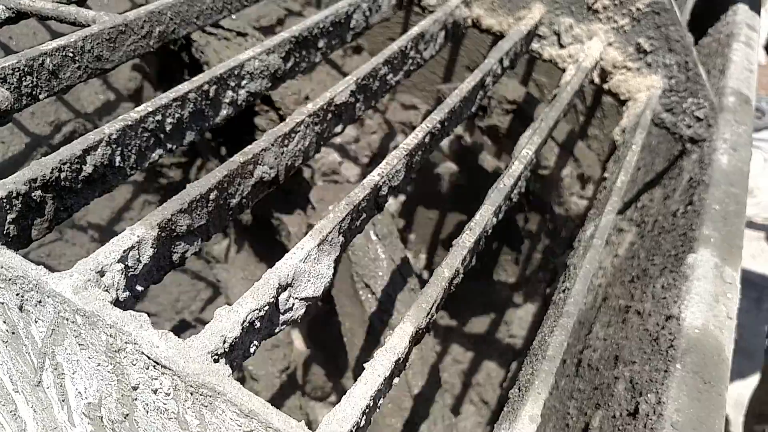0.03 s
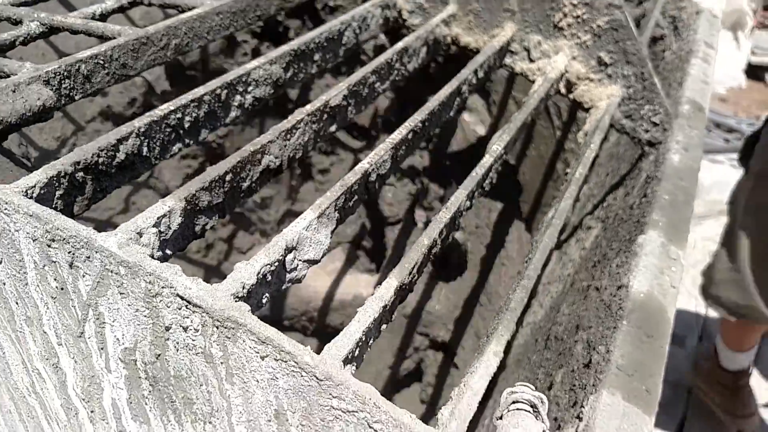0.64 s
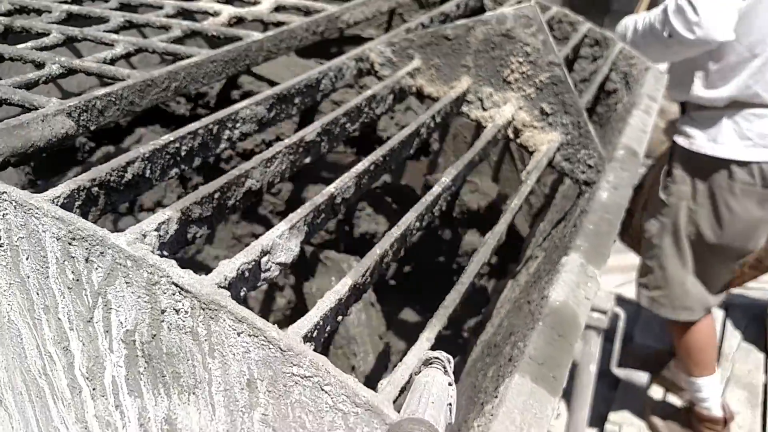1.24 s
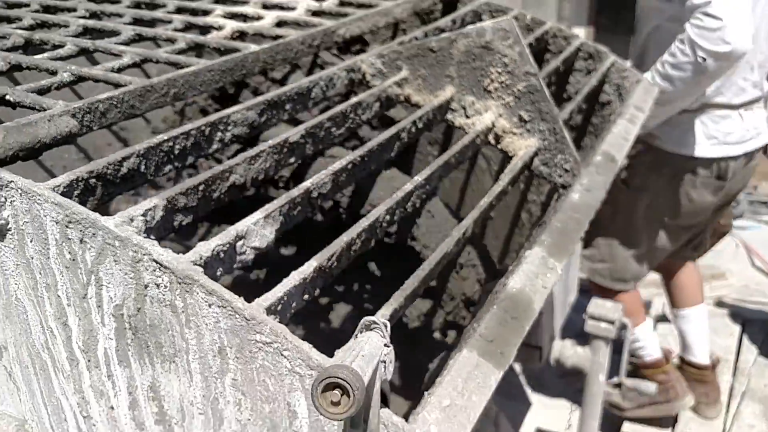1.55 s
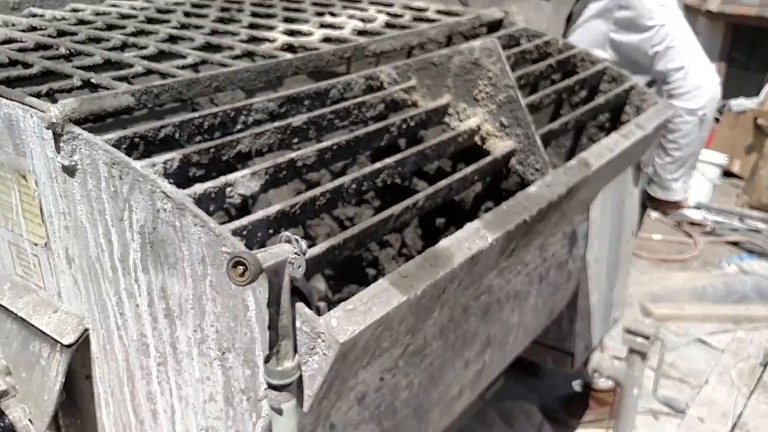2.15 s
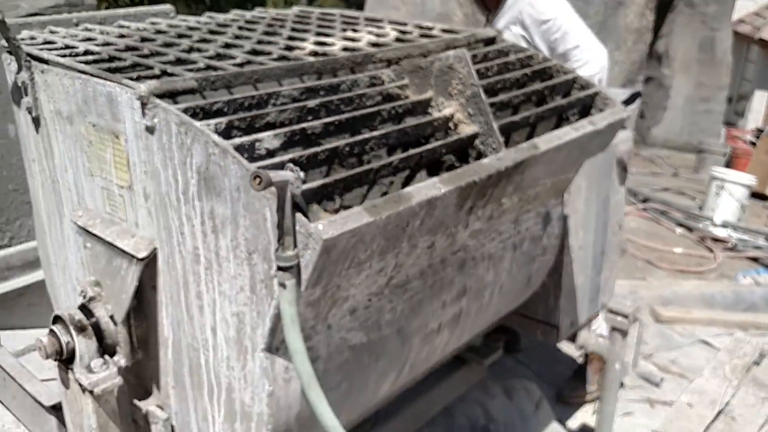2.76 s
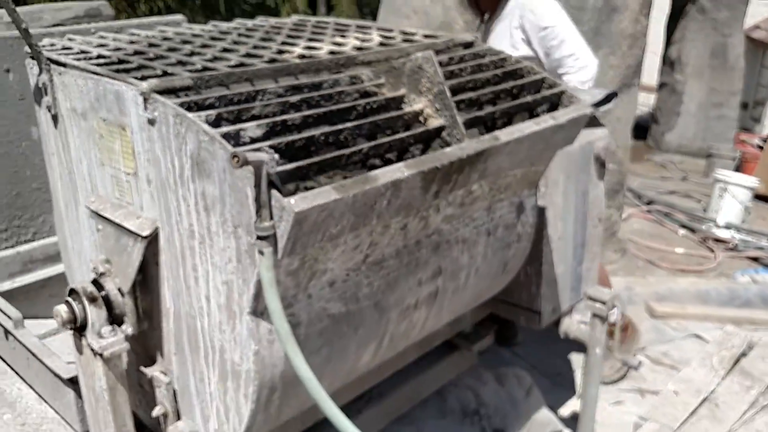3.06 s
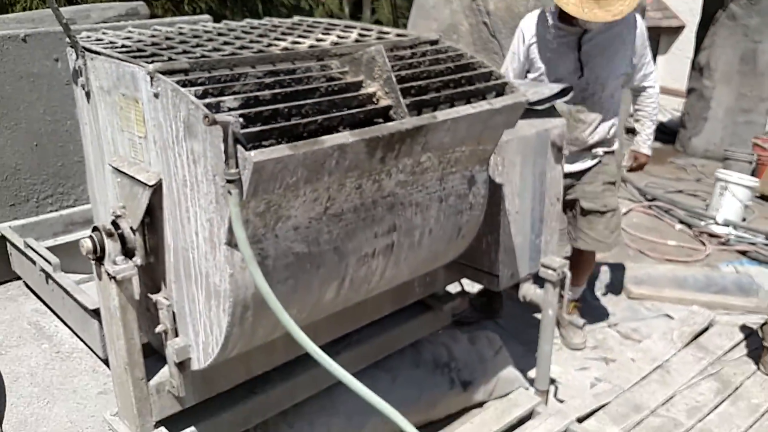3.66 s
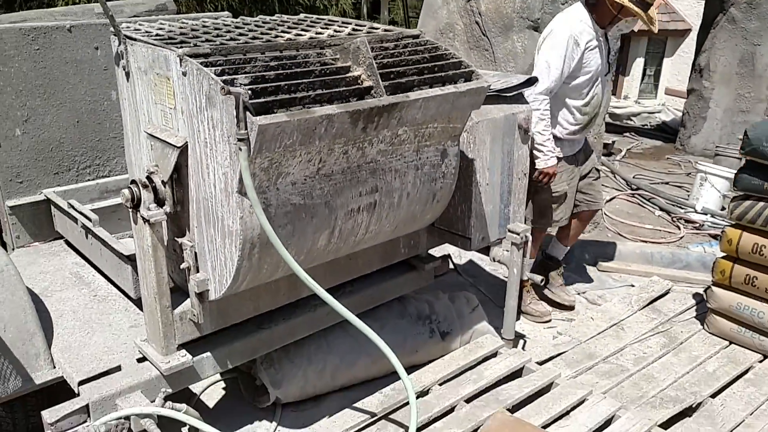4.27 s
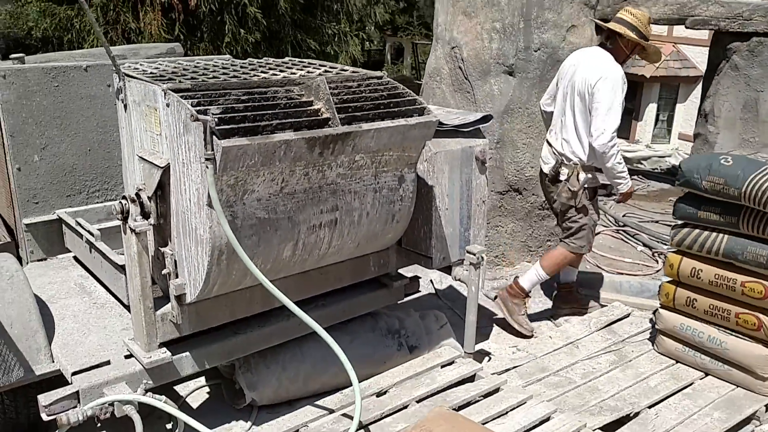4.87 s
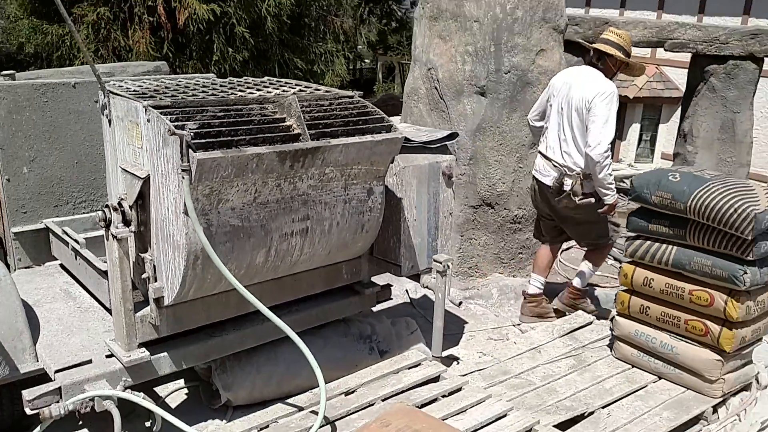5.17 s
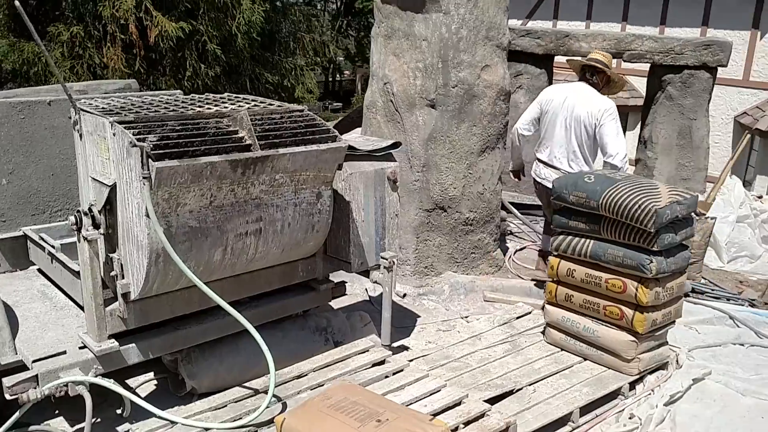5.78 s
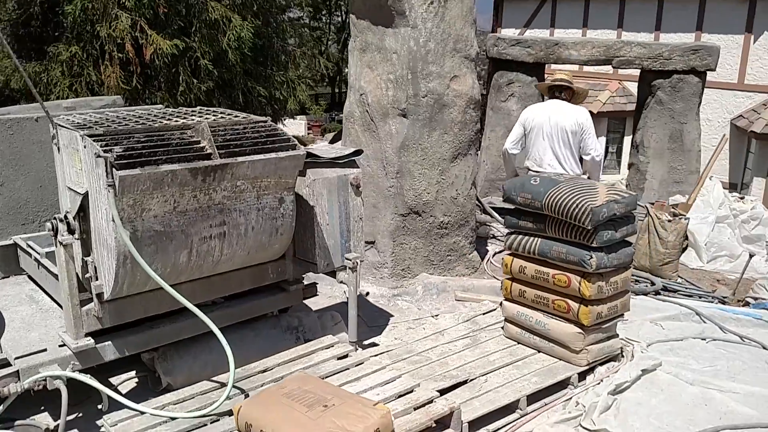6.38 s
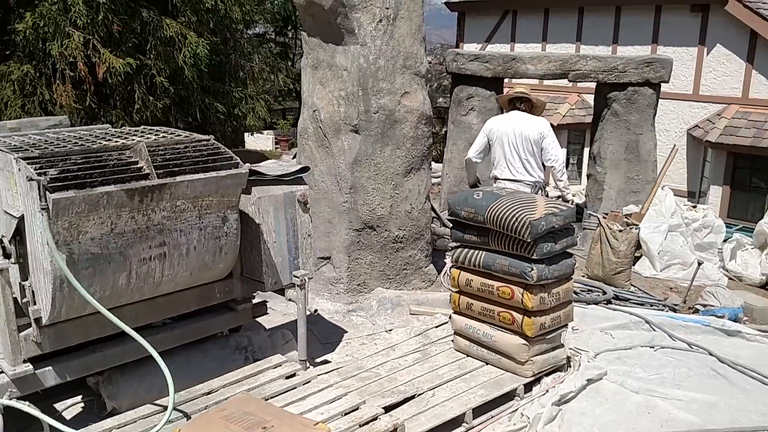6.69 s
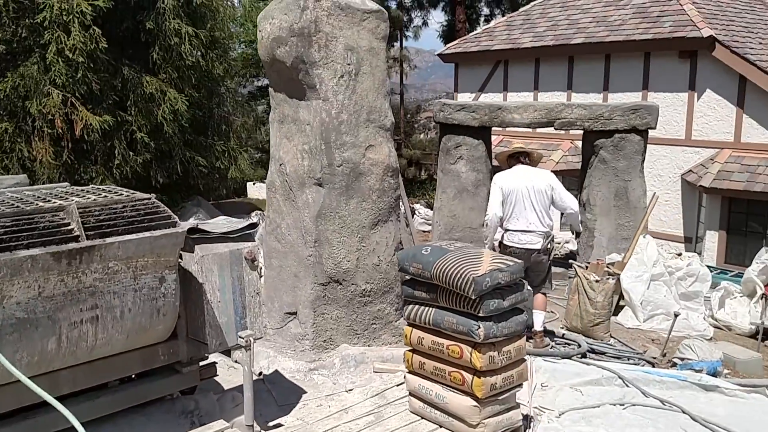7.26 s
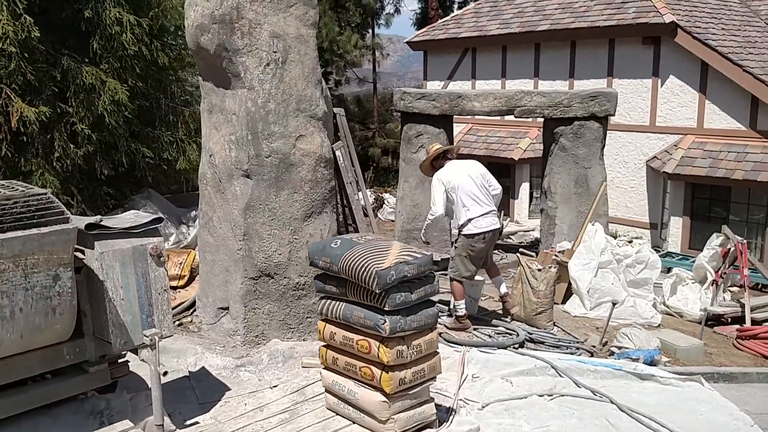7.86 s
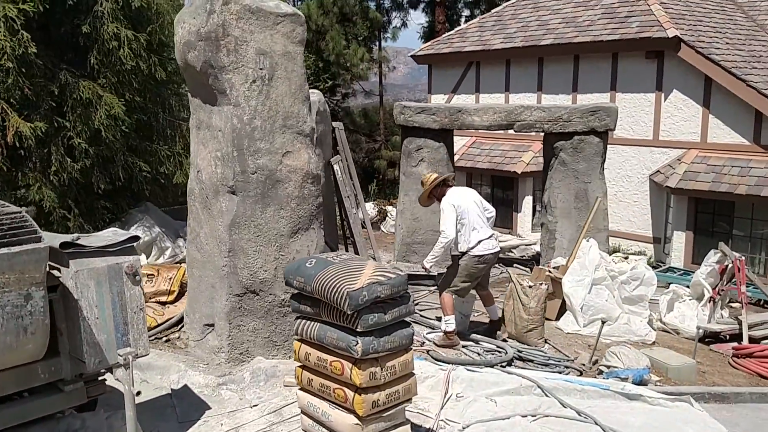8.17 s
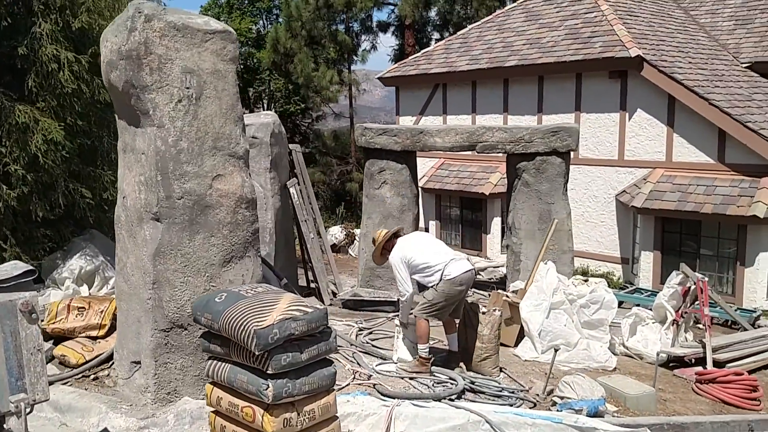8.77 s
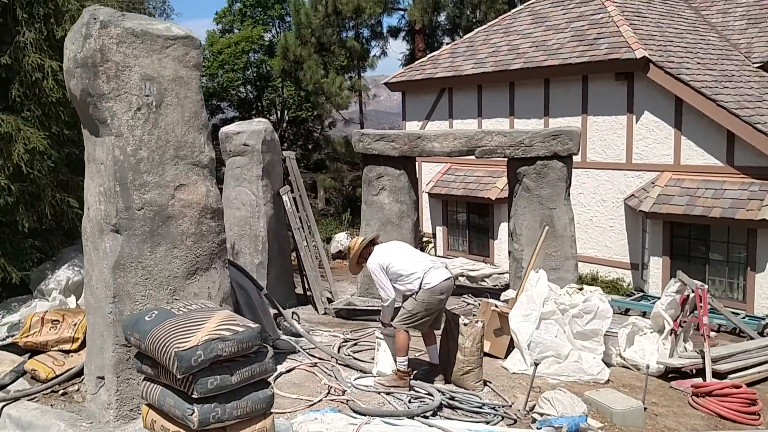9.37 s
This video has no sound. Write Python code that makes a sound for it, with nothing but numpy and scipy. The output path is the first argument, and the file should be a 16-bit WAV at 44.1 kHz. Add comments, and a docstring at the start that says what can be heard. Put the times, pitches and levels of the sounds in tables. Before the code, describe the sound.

A mortar mixer's engine chugs steadily outdoors with a metallic clatter, its speed sagging and recovering under load.

```python
"""A four-stroke V-twin drives a mortar mixer on a building site, its speed sagging as the paddles dig in.
Two unevenly spaced exhaust pulses excite the resonances of the pipes and the intake thumps in its air box.
Each firing forces the block, hood and loose steel into vibration; a gear whine and a hiss come and go.
The listener starts over the churning drum, where a paddle knocks once, then steps back and turns away."""
import sys
import numpy as np
from scipy import signal
from scipy.fft import rfft, irfft, next_fast_len
from scipy.io import wavfile
from scipy.ndimage import uniform_filter1d

SR = 44100
rng = np.random.default_rng(int(sys.argv[2]) if len(sys.argv) > 2 else 0)


def to_wav(s):
    """Save 16-bit WAV."""
    ch = np.atleast_2d(s).T  # columns
    pcm = np.round(np.clip(ch, -1, 1) * 32767)  # PCM
    wavfile.write(sys.argv[1], SR, pcm.astype(np.int16))


N = 424683
TIME = np.arange(N) / SR
FFT_SIZE = next_fast_len(N + SR // 2, True)
FREQS = np.fft.rfftfreq(FFT_SIZE, 1 / SR)


def undb(db):
    """Amplitude ratio of a level in decibels."""
    return 10 ** (np.asarray(db) / 20)

def unit(x):
    """Normalisation to rms 1."""
    return x / np.sqrt(np.mean(x ** 2))

def steady(x):
    """Running normalisation to rms 1 over about half a second."""
    power = uniform_filter1d(x * x, size=SR // 2)
    return x / np.sqrt(uniform_filter1d(power, size=SR // 8) + 1e-18)

def curve(table, column=1):
    """Linear interpolation of a table column over time."""
    rows = np.array(table)
    return np.interp(TIME, rows[:, 0], rows[:, column])

def swells(table):
    """Gaussian envelopes, one around each row's moment."""
    return sum(undb(db) * np.exp(-((TIME - s) / half_s) ** 2) for s, db, half_s in table)

def walk(rate):
    """Slow random modulation of rms 1."""
    hold = int(SR / rate)
    steps = np.repeat(rng.standard_normal(N // hold + 1), hold)
    return unit(uniform_filter1d(steps, hold)[:N])

def through(x, response):
    """Linear filtering: the spectrum is multiplied by a frequency response."""
    return irfft(rfft(x, FFT_SIZE) * response, FFT_SIZE)[:N]

def colour(points):
    """Spectral envelope through (Hz, dB) points on a logarithmic frequency axis."""
    hz, db = np.transpose(points)
    return undb(np.interp(np.log(FREQS + 1), np.log(hz), db))

def ring(modes):
    """Modal superposition: the summed response of damped resonances."""
    s = 1j * FREQS
    return sum(undb(db) * s * width / (s * s + s * width + hz * hz) for hz, width, db in modes)

def dense_ring(decay_s):
    """High modal overlap: the impulse response is decaying noise of unit energy."""
    tail = rng.standard_normal(N) * np.exp(-TIME / decay_s)
    return rfft(tail / np.linalg.norm(tail), FFT_SIZE)

def low_pass(hz):
    """Two-pole low-pass response."""
    s = 1j * FREQS / hz
    return 1 / (1 + np.sqrt(2) * s + s * s)

def high_pass(hz):
    """Two-pole high-pass response."""
    return -(FREQS / hz) ** 2 * low_pass(hz)

def below(hz, order):
    """Zero-phase low-pass response, steeper with higher order."""
    return 1 / (1 + (FREQS / hz) ** order)

def impulses(times, sizes):
    """Impulsive excitation at the given moments."""
    return np.bincount(np.clip(times * SR, 0, N).astype(int), sizes, N + 1)[:N]

def strokes(cycles, phase, scatter_db, jitter_s):
    """Quasi-periodic excitation: one push per cycle, varying in strength and timing."""
    due = np.arange(int(cycles[-1]) + 1) + phase
    times = np.interp(due, cycles, TIME, right=2 * TIME[-1])
    chance = rng.standard_normal((len(times), 2))
    return impulses(times + jitter_s * chance[:, 0], undb(scatter_db * chance[:, 1]))

def bursts(pushes, rise_s, decay_s):
    """Envelope with exponential rise and decay after every push; rms 1."""
    s = 2j * np.pi * FREQS
    return unit(through(pushes, 1 / ((1 + s * rise_s) * (1 + s * decay_s))))

def grains(rate, spread_db):
    """Shot noise: dense tiny impacts of unequal size; rms 1."""
    hits = (rng.random(N) < rate / SR) * rng.standard_normal(N)
    return unit(hits * undb(spread_db * np.minimum(rng.exponential(size=N), 4)))

def detour(x, metres):
    """Propagation delay over an extra path at the speed of sound."""
    return np.interp(TIME - metres / 343, TIME, x)

def bounced(x, path, top_hz):
    """Reflection of the low frequencies over a path that changes as the listener moves."""
    return curve(path, column=2) * detour(through(x, below(top_hz, order=8)), curve(path))

def scatter(x, strength, drift_m, count=3):
    """Comb filtering: reflections off drum, sacks and stones shift as the listener walks."""
    paths_m = rng.uniform(.15, 1.6, count)
    strength = min(strength, .8 / count)  # together weaker than the direct sound
    return x + strength * sum(detour(x, metres + drift_m * walk(1)) for metres in paths_m)


# Paddles dragging in mortar. Each row: time of deepest sag in seconds, cycles per second lost.
PADDLE_LOADS = [(.074, 1.824), (.692, .869), (1.187, 1.058), (1.762, .63), (2.296, .803), (2.969, .469),
                (3.436, .728), (4.15, .596), (4.63, .855), (5.291, .338), (5.685, .571), (6.387, .483),
                (6.892, .694), (7.522, .339), (7.985, .606), (8.821, .543), (9.302, .766)]

def engine_rate():
    """Load and regulation: each paddle lowers the cycle rate, then the governor restores it."""
    unloaded_hz, dig_s, recover_s = 19.348, .508, .487
    sag_hz = sum(lost * np.interp(TIME - s, [-dig_s, 0, recover_s], [0, 1, 0]) for s, lost in PADDLE_LOADS)
    return unloaded_hz - sag_hz


# The chug rises as the listener rounds the drum and falls on walking away.
# Each row: time in seconds, relative level in dB.
CHUG_LEVEL = [(0.4, -16), (0.98, -18), (1.12, -15), (3.05, -11), (4.78, -12.5), (6.38, -13.5), (7.7, -14.5),
              (8.19, -16.5), (9.5, -15.5)]

def with_chug(top_db, share):
    """Common modulation: a level in dB that peaks at top_db and follows a share of the chug's swing."""
    chug_db = curve(CHUG_LEVEL)
    return top_db + share * (chug_db - chug_db.max())


# Modes of the two pipes and the air box. Each row: frequency in Hz, bandwidth in Hz, gain in dB.
PIPE_A_MODES = [(72.8, 20.5, -17.5), (144.9, 8.5, -11.5), (231.5, 37, -19.5), (302.2, 9.1, -18),
                (349, 30.7, -17.5), (551.3, 17.2, -18), (780, 9.3, -35.5)]
PIPE_B_MODES = [(113, 11, -39.5), (239.4, 30, -25.5), (307.6, 41.7, -20), (344.5, 20.3, -19),
                (427.6, 27.3, -15.5), (495, 12, -29.5), (620, 6.5, -39)]
AIR_BOX_MODES = [(97.4, 15.9, -9.5), (170.7, 5.5, -21.5), (348, 160, -28)]

def exhaust_and_intake(cycles):
    """Air-column resonance: gas pulses ring the pipes and, with opposite sign, the air box."""
    pipe_a = through(strokes(cycles, phase=.426, scatter_db=.85, jitter_s=.00005), ring(PIPE_A_MODES))
    pipe_b = through(strokes(cycles, phase=.803, scatter_db=.78, jitter_s=.00005), ring(PIPE_B_MODES))
    intake = through(strokes(cycles, phase=.735, scatter_db=.84, jitter_s=.00005), ring(AIR_BOX_MODES))
    # the muffler absorbs the treble, and small openings radiate little deep bass
    muffled = through(intake - pipe_a - pipe_b, low_pass(hz=228) * high_pass(hz=90))
    # upper harmonics reverberate in the steel housing as a hollow growl
    direct = np.sqrt(below(hz=560, order=12))
    return through(muffled, direct + np.sqrt(1 - direct ** 2) * dense_ring(decay_s=.03))


# Reflections: off the ground, a second of bass alone, and off the stones.
# Each row: time in seconds, extra path in metres, strength from 0 to 1.
GROUND_PATH = [(5.5, 0.67, 0), (7.3, 0.92, 0.38), (8.2, 0.7, 0.33), (9, 0.56, 0.57), (9.6, 0.48, 0.6)]
BASS_PATH = [(6.3, 1.3, 0.05), (8, 1.24, 0.27), (9.1, 1.41, .8), (9.6, 1.1, 0)]
STONE_PATH = [(6.5, 3.55, 0), (8, 3.56, 0.09), (9, 3.11, 0.29), (9.6, 2.97, 0.3)]

def with_echoes(x):
    """Interference: three reflections join the direct sound as the listener backs away."""
    ground = bounced(x, GROUND_PATH, top_hz=600)
    bass = bounced(x, BASS_PATH, top_hz=204.8)
    stones = bounced(x, STONE_PATH, top_hz=606)
    return x + ground + bass + stones


# Crossovers in Hz between the engine's five registers: boom, hum, thump, body and growl.
CROSSOVERS_HZ = [104, 124, 195, 480]
# Loudness of three of the registers. Each row: time in seconds, relative level in dB.
BOOM_LEVEL = [(0.4, -19.5), (0.95, -19.5), (2.69, -17), (3.95, -19.5), (4.6, -23), (6.12, -19), (6.31, -17),
              (8.0, -15.5), (9.5, -16.5)]
HUM_LEVEL = [(0.4, -16), (0.63, -15.5), (2.28, -19.5), (2.48, -27), (7.3, -35.5), (7.55, -27), (9.5, -21.5)]
GROWL_LEVEL = [(0.4, -30.5), (1.21, -27), (3.14, -27), (4.28, -33.5), (7.62, -29), (8.08, -34), (8.36, -30),
               (9.5, -34)]

def registers(x):
    """Spectral balance depends on position: each band swells and fades as the listener moves."""
    thump_db, body_db = with_chug(top_db=-15, share=1), with_chug(top_db=-15.5, share=.96)
    levels_db = [curve(BOOM_LEVEL), curve(HUM_LEVEL), thump_db, body_db, curve(GROWL_LEVEL) - 3.5]
    edges = [0] + [below(hz, order=40) for hz in CROSSOVERS_HZ] + [below(hz=1100, order=8)]
    return sum(steady(through(x, hi - lo)) * undb(db) for lo, hi, db in zip(edges, edges[1:], levels_db))


# Clean tones in the growl. Each row: multiple of the cycle rate, relative level in dB.
HARMONICS = [(29, -10.5), (31, -11.5), (34, -15.5), (40, -18.5), (48, -21)]

def overtones(cycles):
    """Harmonics of the periodic firing waver above the growl and thin out as the listener backs away."""
    fade_db_per_s = .56
    angle = 2 * np.pi * cycles + .015 * walk(12)
    tones = sum(undb(db) * np.sqrt(2) * np.sin(round(order) * angle) for order, db in HARMONICS)
    return tones * undb(curve(GROWL_LEVEL) + .89 * walk(2.2) - fade_db_per_s * TIME)


# The two cylinders. Each row: firing phase in cycles, clatter weight in dB, rattle weight in dB.
CYLINDERS = [(0.318, 0.5, 3.5), (.697, -0.5, 1)]

def firings(cycles, column, scatter_db, jitter_s):
    """Combustion strikes the structure twice a cycle, weighted by the chosen column."""
    return sum(undb(row[column]) * strokes(cycles, row[0], scatter_db, jitter_s) for row in CYLINDERS)


# Spectrum of the clatter. Each row: frequency in Hz, relative spectral density in dB.
CLATTER_SPECTRUM = [(400, -7.5), (750, -2.5), (1000, 0.5), (1250, -5), (1600, -5.5), (1950, -6), (2250, -8),
                    (2750, -11.5), (3300, -13), (4000, -34.5), (6000, -44.5)]
# Modes of the sheet-metal hood. Each row: frequency in Hz, bandwidth in Hz, gain in dB.
HOOD_MODES = [(1340, 140, -13), (1526, 92, 6.5), (1614, 73, -3.5), (2029, 71, -4.5), (2470, 190, -14),
              (2940, 21, -14), (3200, 60, -18)]

def clatter(cycles):
    """Forced vibration: firings shake the block and hood; gear and fan noise fills the gaps."""
    pushes = firings(cycles, column=1, scatter_db=1.5, jitter_s=.00038)
    shaking = bursts(pushes, rise_s=.0024, decay_s=.017) * grains(rate=6000, spread_db=1)
    drive = shaking + undb(-5) * rng.standard_normal(N)
    broadband = unit(through(drive, colour(CLATTER_SPECTRUM)))
    # the block answers every blow with the same dense ring
    block = unit(through(pushes, dense_ring(decay_s=.085) * colour(CLATTER_SPECTRUM) * low_pass(hz=1120)))
    hood = unit(through(drive, ring(HOOD_MODES) * high_pass(hz=960) * low_pass(hz=3140)))
    casing = undb(-7.5) * broadband + undb(-4.5 + 2.2 * walk(4.4)) * hood + undb(-2) * block
    heard = steady(scatter(casing, strength=.27, drift_m=.048))
    return heard * undb(with_chug(top_db=-37.5, share=.31))


# Spectrum of the rattle. Each row: frequency in Hz, relative spectral density in dB.
RATTLE_SPECTRUM = [(1500, -14.5), (2800, 2), (3800, -0.5), (5000, -2.5), (6500, -3.5), (8300, -5.5),
                   (10000, -15.5), (12500, -23), (15500, -24)]
# Modes of small steel parts. Each row: frequency in Hz, bandwidth in Hz, gain in dB.
BRACKET_MODES = [(2780, 70, 3.5), (2930, 34, 3.5), (3384, 53, -6.5), (4740, 170, -7.5), (5000, 170, -8),
                 (5620, 270, -6), (6270, 230, -7.5), (7650, 130, -9.5)]

def rattle(cycles):
    """Impact noise: valve gear and loose steel give a tick at each firing, then a spray of smaller ones."""
    pushes = firings(cycles, column=2, scatter_db=1.5, jitter_s=.0006)
    spray = bursts(pushes, rise_s=.00096, decay_s=.01) * grains(rate=7800, spread_db=1.5)
    ticks = bursts(pushes * rng.random(N), rise_s=.00028, decay_s=.0027) * rng.standard_normal(N)
    drive = spray + undb(-11) * ticks + undb(-6.5) * rng.standard_normal(N)
    steel = unit(through(drive, colour(RATTLE_SPECTRUM) * (1 + ring(BRACKET_MODES))))
    heard = steady(scatter(steel, strength=.24, drift_m=.0089))
    return heard * undb(with_chug(top_db=-52, share=.39))

def plate(cycles, modes, band, rise_s, decay_s):
    """Bending modes: each firing makes a steel plate chatter on its mounts and ring."""
    pushes = firings(cycles, column=2, scatter_db=2.8, jitter_s=.00066)
    chatter = bursts(pushes, rise_s, decay_s) * grains(rate=2500, spread_db=1.5)
    return unit(through(chatter, ring(modes) * colour(band)))


# Modes of the engine cover's side panel. Each row: frequency in Hz, bandwidth in Hz, gain in dB.
PANEL_MODES = [(1131, 96, -0.5), (1310, 110, 1), (1407, 71, -2.5), (1672, 70, 2), (2594, 56, -1.5)]
# The band it radiates. Each row: frequency in Hz, gain in dB.
PANEL_RADIATION = [(600, -18), (1100, 1.5), (2600, -1.5), (4000, -24.5)]
# Its loudness. Each row: time in seconds, level in dB.
PANEL_HEARD = [(1, -46), (5, -61), (6.4, -46), (8.2, -43), (9.5, -53)]

def side_panel(cycles):
    """Plate resonance in the midrange: it fades, then returns as the listener backs away."""
    return undb(curve(PANEL_HEARD)) * plate(cycles, PANEL_MODES, PANEL_RADIATION, rise_s=.003, decay_s=.02)


# Spectrum of churning mortar. Each row: frequency in Hz, relative spectral density in dB.
CHURN_SPECTRUM = [(20, -17.5), (45, -16.5), (75, -12), (120, -10), (200, 1), (370, -0.5), (550, -9),
                  (850, -15.5), (1250, -21.5), (2000, -30.5), (3000, -41.5), (12000, -67)]
# Modes of the loaded drum. Each row: frequency in Hz, bandwidth in Hz, gain in dB.
DRUM_MODES = [(137, 19, -4), (180, 7, 15.5), (298, 21, -7), (445, 26, -4), (593, 44, -12), (850, 140, -22)]
# The contacts of the paddle's knock, and the snaps of grit. Each row: start in seconds, relative level in dB.
KNOCK_CONTACTS = [(.7545, -3), (.779, -11)]
GRIT_SNAPS = [(0.756, -38), (1.05, -39), (3.324, -38)]

def drum():
    """Impact excitation: wet mortar churns, a paddle rings the drum and grit snaps against the steel."""
    churn = unit(through(grains(rate=1500, spread_db=1.5), colour(CHURN_SPECTRUM)))
    churn *= undb(-27.5 + 1.2 * walk(5))
    times, levels_db = np.transpose(KNOCK_CONTACTS)
    knock = through(impulses(times, undb(levels_db)), ring(DRUM_MODES) * low_pass(hz=650))
    knock *= undb(levels_db.max()) / np.abs(knock).max()
    snaps = sum(undb(db) * (TIME > s) * np.exp(-np.abs(TIME - s) / .0063) for s, db in GRIT_SNAPS)
    grit = snaps * undb(-5.5) * unit(through(rng.standard_normal(N), colour(RATTLE_SPECTRUM)))
    direct = churn + knock + grit
    return (direct + bounced(direct, GROUND_PATH, top_hz=555)) / (1 + curve(GROUND_PATH, column=2))


# Swells of gear whine. Each row: centre in seconds, nominal peak in dB, half length in seconds.
WHINE_SWELLS = [(1.902, -38, 1), (3.1, -35.5, 0.45), (5.1, -39, 0.24), (6.503, -42.5, 0.55),
                (9.044, -37.5, 0.41)]

def gears(cycles):
    """Mesh frequency: teeth engage, slightly unevenly, at a fixed multiple of the engine speed."""
    teeth_per_cycle = 36
    tone = np.sqrt(2) * np.sin(2 * np.pi * teeth_per_cycle * cycles + .52 * walk(25))
    return tone * swells(WHINE_SWELLS) * undb(2 * walk(14))


# Swells of hiss. Each row: centre in seconds, nominal peak in dB, half length in seconds.
HISS_SWELLS = [(1.5, -65, 0.48), (7.7, -66.5, 0.66)]
# Spectrum of the hiss. Each row: frequency in Hz, relative spectral density in dB.
HISS_SPECTRUM = [(3500, -29.5), (4900, -8), (5600, 3), (6300, -7.5), (9500, -15), (15000, -27)]

def hiss():
    """Amplitude-modulated noise: a thin, high band flickers as it comes and goes."""
    envelope = swells(HISS_SWELLS) * undb(1.5 * walk(12))
    return envelope * unit(through(rng.standard_normal(N), colour(HISS_SPECTRUM)))


# Modes of a steel guard on the engine side. Each row: frequency in Hz, bandwidth in Hz, gain in dB.
GUARD_MODES = [(2530, 50, -7), (2646, 160, 0.5), (2855, 50, 2.5), (3120, 93, -5), (3380, 65, -1.5),
               (4120, 72, -7.5)]
# The band it radiates. Each row: frequency in Hz, gain in dB.
GUARD_RADIATION = [(1500, -23.5), (2500, 1), (4200, -2), (6000, -16.5)]
# Its loudness. Each row: time in seconds, level in dB.
GUARD_HEARD = [(2.1, -62), (2.6, -53.5), (3.2, -46), (3.8, -52), (6.5, -49), (8.6, -58), (9.3, -67)]

def guard(cycles):
    """Plate resonance in the treble, loudest once the listener is round the drum."""
    ringing = plate(cycles, GUARD_MODES, GUARD_RADIATION, rise_s=.0011, decay_s=.0091)
    return undb(curve(GUARD_HEARD)) * ringing

def turned_away(x):
    """Acoustic shadow: as the listener turns, the treble drops and part arrives diffusely via the yard."""
    turn_s, turn_length_s, shade_hz, shade_db = 7.9, .34, 6000, -7
    turned = .5 + .5 * np.tanh((TIME - turn_s) / turn_length_s)
    diffuse_share = .35 * turned
    diffuse = through(x, dense_ring(decay_s=.025))
    blurred = np.sqrt(1 - diffuse_share) * x + np.sqrt(diffuse_share) * diffuse
    treble = through(blurred, np.abs(high_pass(shade_hz)) ** 2)
    return blurred - (1 - undb(shade_db * turned)) * treble

def scene():
    """Superposition: one crankshaft times all the engine's sounds; the drum and the hiss add to them."""
    cycles = np.cumsum(engine_rate()) / SR
    casing, steel = clatter(cycles), rattle(cycles)
    chug = registers(with_echoes(exhaust_and_intake(cycles))) + overtones(cycles)
    plates = guard(cycles) + side_panel(cycles)
    return (chug + casing + plates + drum() + gears(cycles) + turned_away(steel) + hiss())[None]


# The opening fade. Each row: time in seconds, gain in dB.
OPENING_FADE = [(.11, -77), (.118, -24), (.16, -15), (.215, -9), (.27, -5), (.42, 0)]

def record(dry):
    """Amplitude and band limiting: the sound fades in, clips at full scale and loses its highest treble."""
    top_hz = 15600
    clipped = np.clip(dry * undb(curve(OPENING_FADE)), -1, 1)
    return signal.sosfilt(signal.ellip(8, .2, 70, top_hz, fs=SR, output="sos"), clipped)


dry = scene()
out = record(dry)
to_wav(out)
```